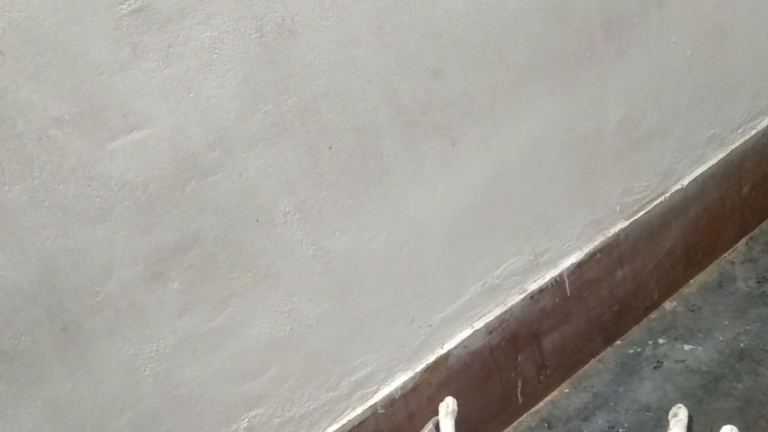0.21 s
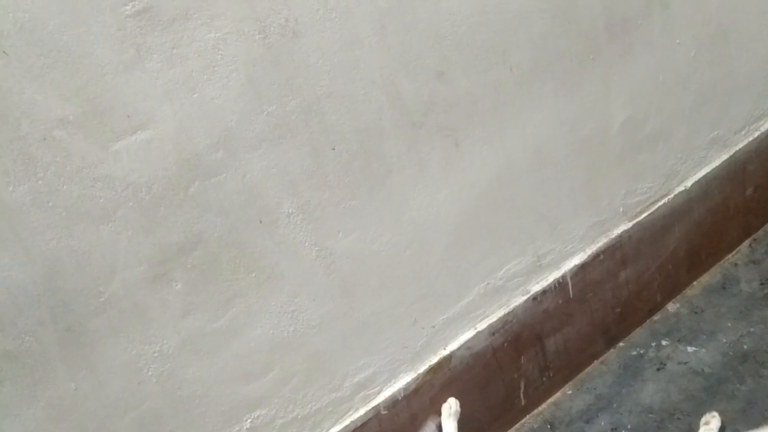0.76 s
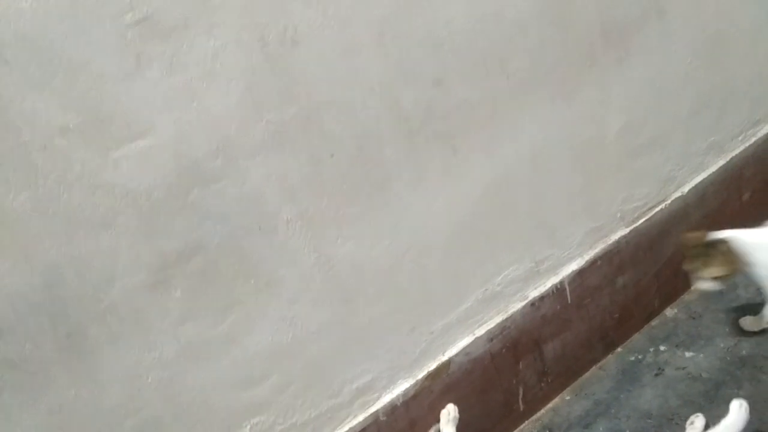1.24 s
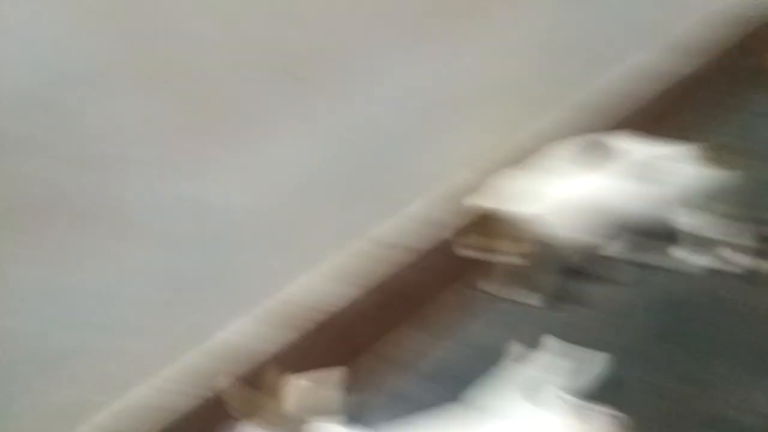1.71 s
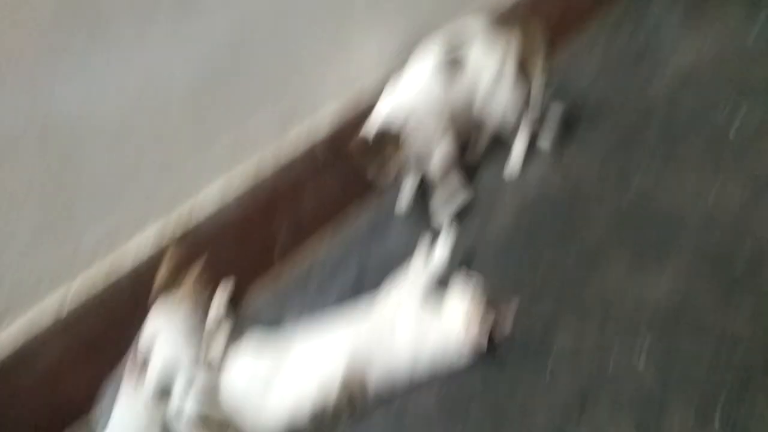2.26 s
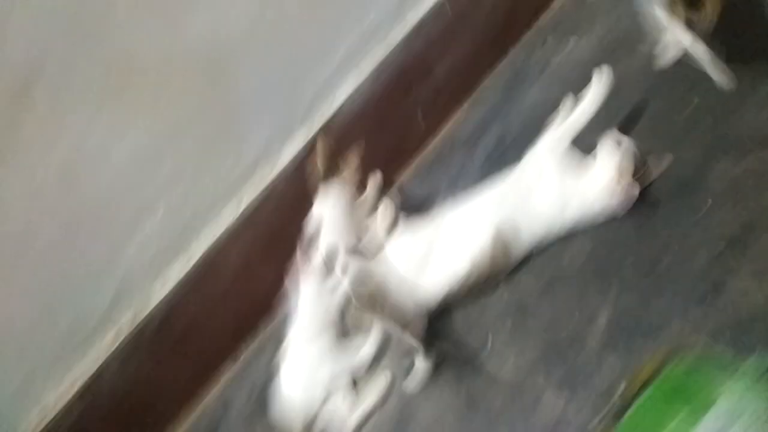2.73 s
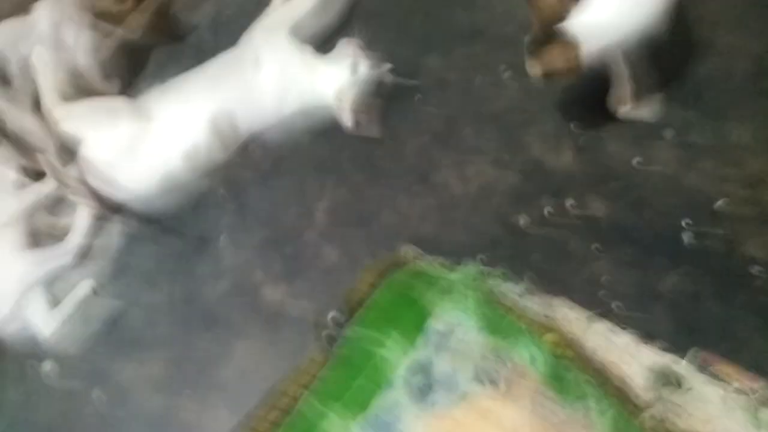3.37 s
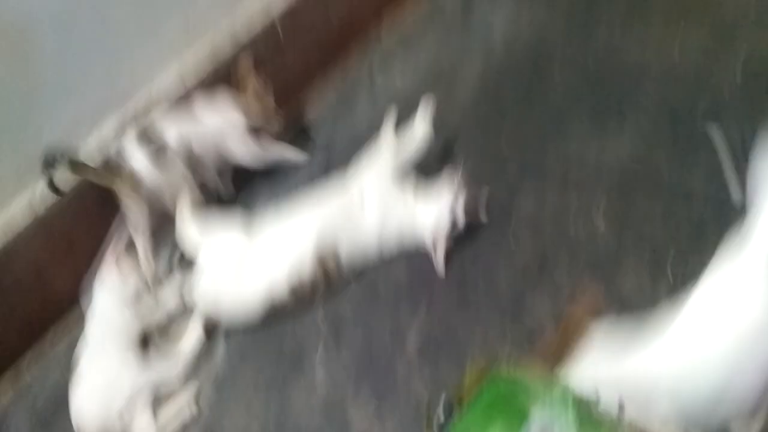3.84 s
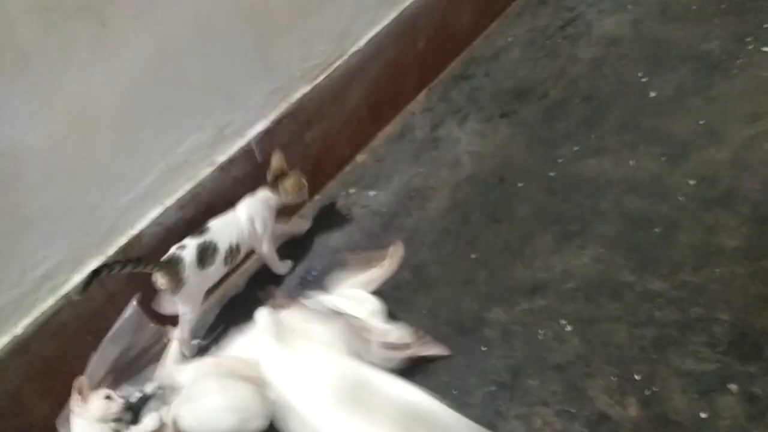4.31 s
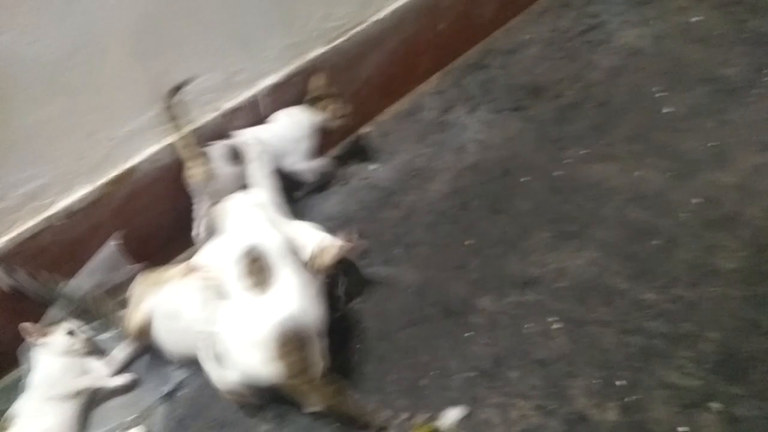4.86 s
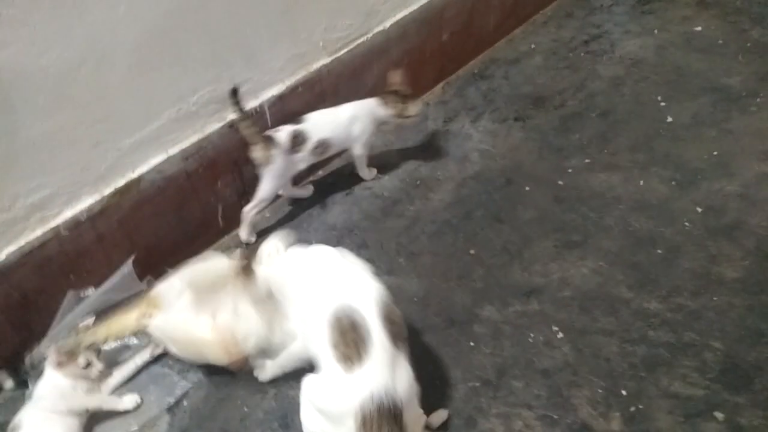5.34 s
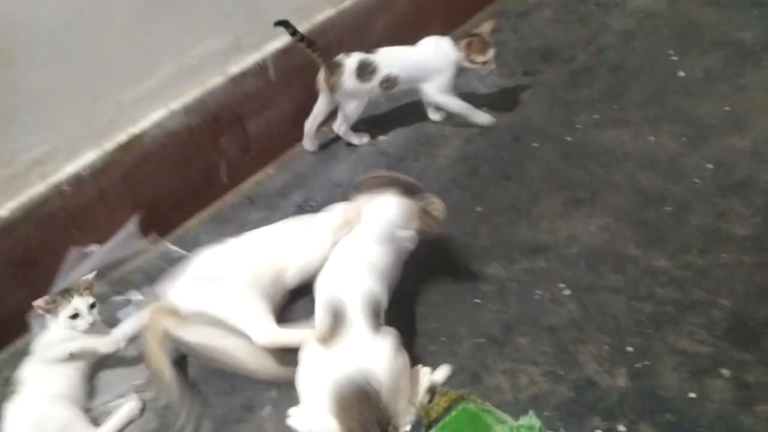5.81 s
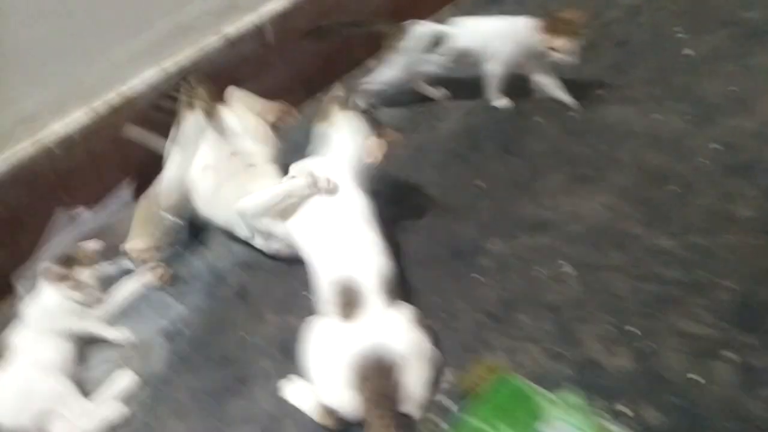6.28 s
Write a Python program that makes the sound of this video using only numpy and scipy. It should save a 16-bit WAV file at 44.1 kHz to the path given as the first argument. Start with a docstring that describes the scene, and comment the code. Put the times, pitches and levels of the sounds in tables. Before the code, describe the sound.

In a bare, lightly echoing room, kittens tussle on a hard floor. Two thin, wavering yowls come first among dull bumps that jolt the microphone and small plastic snaps. Plastic slides and crackles very close, then lets go in a sudden burst of cracks. A low growl follows, a third yowl swells, and a short growl rises into a harsh, hissing snarl. A final growl and crisp plastic rustling finish it.

```python
"""Kittens wrestle on a hard floor in a bare room, over a low room tone.
Two thin, wavering yowls come first, among dull knocks that jolt the phone and sharp plastic snaps.
Close plastic slides and crackles, a taut fold lets go in a run of cracks, and a low growl begins.
A third yowl swells and a short growl leads into one harsh, hissing snarl; a last growl and slides follow.
Voices are unsteady harmonics and gated noise in a coloured throat; the rest is shaped noise and pulses."""
import sys
import numpy as np
from scipy import signal
from scipy.fft import rfft, irfft
from scipy.io import wavfile
from scipy.ndimage import uniform_filter1d

SR = 44100
rng = np.random.default_rng(int(sys.argv[2]) if len(sys.argv) > 2 else 0)


def wav_out(sig):
    """Save sig, one row per channel (or a flat mono array), as 16-bit PCM at SR to the path in sys.argv[1]."""
    wavfile.write(sys.argv[1], SR, np.round(np.clip(np.atleast_2d(sig).T, -1, 1) * 32767).astype(np.int16))


N = 289737  # length in samples
T = np.arange(N) / SR  # time in seconds


def undb(db):
    """Decibels to gain."""
    return 10 ** (np.asarray(db) / 20)


def unit(x):
    """Scale to rms 1."""
    return x / np.sqrt(np.mean(x ** 2) + 1e-20)


def steady(x):
    """Even out a sound's slow level over 50 ms, keeping its fast flutter."""
    power = np.abs(uniform_filter1d(x ** 2, int(0.05 * SR)))
    return x / np.sqrt(power + 1e-12)


def curves(rows, t):
    """Each column of a table as a curve over time."""
    s, *columns = np.transpose(rows)
    return [np.interp(t, s, c) for c in columns]


def span(start, end):
    """The times from start to end, in seconds, from the beginning of the scene at the earliest."""
    return T[max(int(start * SR), 0):int(end * SR)]


def ramp(t, length):
    """A smooth rise from 0 to 1 over some length of time."""
    return np.sin(np.pi / 2 * np.clip(t / length, 0, 1)) ** 2


def envelope(t, attack, hold, sag_db, release):
    """Rise, sag by so many dB a second, and from the hold time on also die away exponentially."""
    rise = np.clip(t / attack, 0, 1)
    sag = undb(-sag_db * np.maximum(t - attack, 0))
    return rise * sag * np.exp(-np.maximum(t - hold, 0) / release)


def walk(rate, size=N):
    """Random wander of spread 1, sliding to a new level so many times a second."""
    levels = rng.standard_normal(4096)
    return unit(np.interp(T[:size] * rate, np.arange(len(levels)), levels))


def level_at(hz, points):
    """Read a (Hz, dB) colour at some frequencies."""
    f, db = np.transpose(points)
    return np.interp(np.log(hz), np.log(f), db)


def response(points, size=1024):
    """Minimum-phase impulse response with a (Hz, dB) colour, by folding its cepstrum."""
    hz = np.arange(size // 2 + 1) * SR / size + 1
    cepstrum = irfft(np.log(undb(level_at(hz, points))))
    cepstrum[1:size // 2] *= 2
    cepstrum[size // 2 + 1:] = 0
    return irfft(np.exp(rfft(cepstrum)))


def colour(x, points, size=1024):
    """Filter a sound with a (Hz, dB) colour."""
    return signal.oaconvolve(x, response(points, size=size))[:len(x)]


def add(out, s, sound):
    """Mix a short sound in at time s."""
    i = int(s * SR)
    out[i:i + len(sound)] += sound[:N - i]


def room(x, t60, wet_db):
    """Direct sound plus the diffuse ring of bare walls, a noise tail that falls 60 dB in t60 seconds."""
    t = T[:SR // 3]
    tail = rng.standard_normal(len(t)) * undb(-60 * t / t60) * (t > 0.004)
    tail = tail / np.sqrt(np.sum(tail ** 2))
    return x + undb(wet_db) * signal.fftconvolve(x, tail)[:len(x)]


def crinkle(spread_db):
    """Dense tiny slips of very unequal size."""
    slips = rng.standard_normal(N) * (rng.random(N) < 0.3)
    return slips * undb(spread_db * np.minimum(rng.exponential(size=N), 6))


def room_tone(level_db=-64.5):
    """A low rumble and faint hiss that stir a little, from coloured noise."""
    # spectrum of the room tone: frequency_hz, relative_level_db
    tone_colour = [(18, -55.5), (30, -21), (60, -11), (100, -2.5), (135, -9), (175, -14.5), (273, -7.5),
                   (336, -12), (437, -14.5), (526, -15), (600, -20.5), (844, -16.5), (1220, -24),
                   (1670, -22.5), (3980, -37), (6500, -40), (11000, -37), (14000, -58)]
    noise = unit(colour(rng.standard_normal(N), tone_colour, size=4096))
    return noise * undb(level_db + 1.3 * walk(9))


def fur():
    """Bodies brush softly over the floor while the kittens tussle: many tiny slips under a slow level."""
    # loudness of the brushing, before its flutter: time_s, level_db
    brushing = [(2.9, -92), (3.7, -76), (4.45, -72), (5.3, -73), (6.5, -71)]
    # spectrum of the brushing: frequency_hz, relative_level_db
    fur_colour = [(1000, -8), (4000, -9), (7000, -3), (10500, 0), (13000, -12), (16000, -20)]
    return unit(colour(crinkle(1.3), fur_colour)) * undb(curves(brushing, T)[0] + 2 * walk(12))


def knocks(fizz_db=-38, fizz_s=0.04, rumble_db=-30, rumble_s=0.06):
    """Each knock is a sudden push that a bass cut turns into a click, with a boom, rumble and faint fizz."""
    # dull knocks, pushes before the bass cut: start_s, push_level_db, relax_s
    jolts = [(0.4033, -26, 0.0087), (0.4602, -27, 0.035), (0.5713, -25, 0.037), (0.5819, -24, 0.015),
             (1.1986, -25, 0.043), (1.673, -27, 0.025), (2.9535, -27, 0.015), (3.3843, -23.5, 0.047),
             (3.457, -41, 0.03), (4.2333, -28, 0.03), (5.5132, -25, 0.038)]
    # colour of a knock: frequency_hz, gain_db
    knock_colour = [(30, -1), (150, 0.5), (800, -0.5), (2500, -2), (7000, 1), (11000, -5), (14000, -20)]
    push, fizz_gain, rumble_gain = np.zeros((3, N))
    t = T[:SR // 3]
    for s, db, relax in jolts:
        add(push, s, -undb(db) * np.exp(-t / relax))
        add(fizz_gain, s, undb(db + fizz_db) * np.exp(-t / fizz_s))
        add(rumble_gain, s, undb(db + rumble_db) * envelope(t, 0.02, 0.02, 0, rumble_s))
    rumble_band = signal.butter(2, [40, 130], "band", fs=SR, output="sos")
    rumble = unit(signal.sosfilt(rumble_band, rng.standard_normal(N)))
    bass_cut = signal.butter(4, 50, "high", fs=SR, output="sos")
    thud = signal.sosfilt(bass_cut, colour(push, knock_colour))
    boom = signal.lfilter(*signal.iirpeak(76, 2.6, fs=SR), thud)
    fizz_band = signal.butter(3, [5200, 10000], "band", fs=SR, output="sos")
    fizz = unit(signal.sosfilt(fizz_band, rng.standard_normal(N)))
    thud_in_room = room(thud, t60=0.28, wet_db=-9)
    return thud_in_room + undb(-2.0) * boom + rumble * rumble_gain + fizz * fizz_gain


def rustle(sag_db_per_s=75, release_s=0.016):
    """Plastic slides as dense bright slips, with a coarser scrape; each stroke slows down, then stops."""
    # strokes, levels before sag and flutter: start_s, attack_s, length_s, sheen_level_db, scrape_level_db
    strokes = [(0.9, 0.025, 0.12, -63, -63), (1.855, 0.012, 0.045, -55, -80),
               (1.944, 0.005, 0.075, -33.7, -66), (2.02, 0.025, 0.11, -43, -70),
               (2.125, 0.06, 0.2, -41, -65), (2.33, 0.025, 0.065, -55, -84), (2.505, 0.004, 0.05, -50, -72),
               (3.055, 0.015, 0.075, -58, -82), (3.13, 0.012, 0.05, -56.5, -80),
               (3.228, 0.07, 0.12, -41, -68), (3.335, 0.02, 0.05, -35, -55), (3.39, 0.014, 0.05, -28, -55),
               (3.49, 0.02, 0.105, -50, -74), (4.025, 0.06, 0.16, -64, -90), (4.75, 0.03, 0.17, -44, -48),
               (5.97, 0.04, 0.08, -58, -76), (6.145, 0.04, 0.18, -38.5, -60),
               (6.381, 0.01, 0.018, -35, -64), (6.421, 0.007, 0.028, -32, -51),
               (6.452, 0.015, 0.115, -36, -43), (6.5, 0.03, 0.07, -33.5, -53)]
    # spectrum of the bright sheen: frequency_hz, relative_level_db
    sheen_colour = [(1760, -44.5), (3000, -31.5), (3750, -30), (4080, -31.5), (5440, -7.5), (5960, -5.5),
                    (7100, 0.5), (7830, 2.5), (9870, 7.5), (11300, 3), (16000, -17.5)]
    # spectrum of the coarser scrape: frequency_hz, relative_level_db
    scrape_colour = [(250, -16), (450, -5), (900, -4), (1700, -2), (3000, 10), (4800, 9), (7000, -10.5),
                     (14000, -31.5)]
    sheen_gain, scrape_gain = np.zeros((2, N))
    for start, attack, length, sheen_db, scrape_db in strokes:
        speed = envelope(T[:SR // 2], attack, length, sag_db_per_s, release_s)
        add(sheen_gain, start, speed * undb(sheen_db))
        add(scrape_gain, start, speed * undb(scrape_db))
    sheen = unit(colour(crinkle(1.3), sheen_colour)) * sheen_gain
    scrape = unit(colour(crinkle(1.6), scrape_colour)) * scrape_gain
    return room((sheen + scrape) * undb(0.9 * walk(120)), t60=0.33, wet_db=-17)


def snaps(run_start_s=3.347, slip_hz=199, first_db=-21, last_db=-5, count=9):
    """Creases pop with a tiny high ring; a taut fold lets go in a fast, swelling run of broad cracks."""
    # single plastic pops: start_s, level_db, ring_hz
    pops = [(0.7891, -46.5, 10700), (0.9135, -42, 6650), (1.0134, -35.5, 6300), (1.8296, -22, 10200),
            (1.8567, -40, 10000), (2.3855, -42.5, 9800), (2.4379, -33, 10500), (2.5034, -24, 10300),
            (2.6161, -30.5, 9700), (2.9294, -42, 10200), (3.1368, -34, 10000), (3.5032, -34, 9810),
            (3.5496, -29.5, 10200), (4.104, -38, 11100), (4.9107, -31, 9500), (6.3887, -32.5, 8550),
            (6.4281, -21, 10100), (6.5484, -24, 9220)]
    # spectrum of the broad crack: frequency_hz, relative_level_db
    crack_colour = [(200, -22), (450, -20), (700, -11), (1500, -12), (2200, -8.5), (4500, -12), (8000, 3),
                    (11000, 1.5), (16000, -15.5)]
    out, t = np.zeros(N), T[:256]
    crack = response(crack_colour)[:len(t)]
    crack = crack / np.abs(crack).max()
    for s, db, hz in pops:
        ring = np.sin(2 * np.pi * hz * t) * np.exp(-t / 0.0004)
        add(out, s, undb(db) * (0.02 * crack + ring))
    # the run swells from first_db towards last_db, uneven in timing and size
    for k, (late, size_db) in enumerate(rng.standard_normal((count, 2))):
        swell_db = (last_db - first_db) * np.sqrt(ramp(k + 0.5, count - 2))
        crack_s = run_start_s + k / slip_hz + 0.00015 * late
        add(out, crack_s, crack * undb(first_db + swell_db + 0.9 * size_db))
    return room(out, t60=0.1, wet_db=-10)


def growls(edge_s=0.06):
    """Low grumbles through a closed mouth: an unsteady, rising fundamental and a weak second harmonic."""
    # growls, pitch and level before their flutter: start_s, length_s, start_pitch_hz, glide_hz_per_s, level_db
    grumbles = [(3.45, 0.56, 163, 28, -64), (4.445, 0.12, 171, 90, -56), (5.95, 0.17, 186, 80, -52)]
    out = np.zeros(N)
    for start, length, hz, glide, db in grumbles:
        t = span(0, length)
        wavering_hz = (hz + glide * t) * (1 + 0.035 * walk(63, len(t)))
        phase = 2 * np.pi * np.cumsum(wavering_hz) / SR
        edges = ramp(t, edge_s) * ramp(length - t, edge_s)
        gain = edges * undb(db + 3.2 * walk(45, len(t)))
        add(out, start, gain * (np.sin(phase) + undb(-17.5) * np.sin(2 * phase)))
    return out


def effort(t, pitch_recovery=1.5):
    """Each push builds up and relaxes; gives the swell in dB and the pitch drop in Hz."""
    # pushes of effort within the cries: peak_s, build_s, relax_s, swell_db, pitch_drop_hz
    pushes = [(0.22, 0.06, 0.05, 0, 22), (0.8, 0.14, 0.2, 23.5, 66), (1.26, 0.03, 0.025, 6, 55),
              (3.975, 0.135, 0.185, 18, 20), (4.665, 0.05, 0.04, 3, 0), (4.855, 0.035, 0.03, 3.5, 0),
              (5.12, 0.07, 0.05, 2, 0), (5.33, 0.04, 0.025, 5, 0)]
    swell, drop = 0, 0
    for peak, build, relax, swell_db, drop_hz in pushes:
        push = ramp(t - peak + build, build) * np.exp(-np.maximum(t - peak, 0) / relax)
        swell = swell + swell_db * push
        # as the push relaxes, the pitch comes back faster than the level
        drop = drop + drop_hz * push ** pitch_recovery
    return swell, drop


def voice(hz, rough, closing, mouth_db, nose_db, wide, narrow, jitter, flutter_hz, shimmer_db, rasp, count=10):
    """Unsteady vocal folds and gated air noise ring the throat; the fundamental leaves through the nose."""
    n, closing = len(hz), np.clip(closing, 0, 1)
    phase = 2 * np.pi * np.cumsum(hz * (1 + jitter * rough * walk(flutter_hz, n))) / SR
    tone = 0
    for k in range(2, count):
        # the closing jaw moves the vowel from the wide to the narrow throat colour
        throat_db = (1 - closing) * level_at(k * hz, wide) + closing * level_at(k * hz, narrow)
        # the tone weakens towards the high harmonics
        tone = tone + undb(throat_db) * np.exp(-(k / 7) ** 2) * np.cos(k * phase)
    tone = steady(tone * undb(shimmer_db * rough * walk(200, n)))
    # air noise pulses once per cycle of the folds
    puffs = rng.standard_normal((2, 2 * SR))[:, :n] * (1 + np.cos(phase))
    open_air = np.sqrt(1 - closing) * colour(puffs[0], wide)
    closed_air = np.sqrt(closing) * colour(puffs[1], narrow)
    air = steady(open_air + closed_air)
    # wall reflections beat with the wavering pitch; levelled afterwards, so the effort sets the level heard
    mouth = steady(room(tone + rasp * rough * air, t60=0.24, wet_db=1))
    hum = np.sin(phase) * undb(4.9 * rough * walk(110, n))
    nose = steady(room(hum, t60=0.27, wet_db=1)) * undb(2 * walk(22, n) - 1)
    return mouth * undb(mouth_db) + nose * undb(nose_db)


def snarl(start_s=4.528, attack_s=0.145, fade_s=5.21, release_s=0.072, level_db=-27.1, sag_db_per_s=23,
          hiss_db=-38.5, hiss_attack_s=0.125, hiss_sag_db_per_s=60):
    """A growl flies up into a harsh open-mouthed cry, air hissing through the teeth, then sags and sinks."""
    # voicing over time, nose before its trim and flutter: time_s, pitch_hz, roughness (0-1),
    # jaw_closing (0-1), nose_level_db
    shape = [(4.53, 194.7, 0.89, 0.2, -54), (4.6, 240, 0.92, 0.03, -49), (4.66, 346, 0.7, 0.05, -45.5),
             (4.88, 386, 0.5, 0, -61), (4.95, 376, 0.46, 0.04, -48), (5.06, 357, 0.85, 0, -65),
             (5.14, 315, 0.7, 0.11, -51), (5.22, 278, 0.89, 0.87, -51), (5.33, 270, 0.92, 0.3, -74)]
    # throat with the jaw open, then nearly closed: frequency_hz, relative_level_db
    open_throat = [(400, -26), (560, -22), (800, -27), (1050, -9), (1250, -6.5), (1500, 2), (1850, 2),
                   (2150, 0), (2500, -10), (3200, -18), (4200, -44), (6000, -56.5)]
    closed_throat = [(200, -18.5), (400, -7), (560, -3), (750, -9), (950, -2), (1250, -3), (1600, -3),
                     (1900, -2), (2600, -24), (4500, -44.5)]
    # spectrum of air forced through the teeth: frequency_hz, relative_level_db
    hiss_colour = [(2000, -25), (4000, -13), (5500, -13), (7500, -2), (9500, 0), (11000, -6), (13000, -19),
                   (16000, -26)]
    out, t = np.zeros(N), span(start_s, start_s + 1)
    age, hold = t - t[0], fade_s - start_s
    hz, rough, closing, nose_db = curves(shape, t)
    force = envelope(age, attack_s, hold, sag_db_per_s, release_s)
    force_db = 20 * np.log10(force + 1e-9)
    swell_db = effort(t)[0]
    cry = voice(hz, rough, closing, level_db + force_db + swell_db, nose_db, open_throat, closed_throat,
                jitter=0.065, flutter_hz=170, shimmer_db=4.5, rasp=0.85)
    hiss = unit(colour(rng.standard_normal(N), hiss_colour))[:len(t)]
    hiss_force = envelope(age, hiss_attack_s, hold, hiss_sag_db_per_s, release_s)
    hiss = hiss * undb(hiss_db) * hiss_force * ramp(age, hiss_attack_s / 2)
    add(out, t[0], (cry + hiss) * ramp(age, 0.012) * ramp(t[-1] - t, 0.16))
    return out


def yowls(attack_s=0.08, release_s=0.09, relaxed_rough=0.45, rough_per_db=0.002, fray=0.35, fray_s=0.25,
          nose_per_db=0.42, mouth_lag_s=0.03):
    """Thin, wavering complaints; as they swell they dip in pitch, turn hoarse and pass from nose to mouth."""
    # yowls at rest, nose before its trim and flutter: start_s, end_s, relaxed_pitch_hz, relaxed_level_db,
    # nose_level_db (the fundamental), jaw_closing (0-1)
    cries = [(-0.1, 0.27, 540, -56.5, -54.5, 0.65), (0.62, 1.4, 556, -54, -56, 0.48),
             (3.81, 4.6, 583, -51.2, -61.5, 0.14)]
    # throat with the jaw open, then nearly closed: frequency_hz, relative_level_db
    open_throat = [(500, -39.5), (780, -29), (940, -3), (1150, -1.5), (1300, -4), (1600, 1), (1800, -8.5),
                   (2050, -15), (2600, -31.5), (3300, -33), (4200, -52), (14000, -73)]
    closed_throat = [(500, -33.5), (780, -28), (930, 2), (1120, 2), (1350, -11), (1650, -11), (2100, -37),
                     (4500, -59)]
    out = np.zeros(N)
    for start, end, hz, db, nose_db, closing in cries:
        t = span(start, end)
        swell, drop = effort(t)
        # the mouth closes just before the voice stops
        shut_db = 20 * np.log10(ramp(end - mouth_lag_s - t, release_s) + 0.05)
        # the voice frays as the air runs out
        rough = relaxed_rough + rough_per_db * swell + fray * ramp(t - end + fray_s, fray_s)
        cry = voice(hz - drop, rough, closing, db + swell + shut_db, nose_db - nose_per_db * swell,
                    open_throat, closed_throat, jitter=0.08, flutter_hz=170, shimmer_db=5.5, rasp=0.62)
        add(out, t[0], cry * ramp(t - start, attack_s) * ramp(end - t, release_s))
    return out


def scene():
    """Room tone, brushing fur, knocks, plastic and the kittens' voices, the same on both channels."""
    background = room_tone() + fur()
    close_by = knocks() + rustle() + snaps()
    voices = growls() + snarl() + yowls()
    mono = background + close_by + voices
    return np.array([mono, mono])


def record(dry, top_hz=15900):
    """Cut off the top of both channels with a steep low-pass."""
    return signal.sosfilt(signal.ellip(10, 0.2, 80, top_hz, fs=SR, output="sos"), dry)


dry = scene()
out = record(dry)
wav_out(out)
```